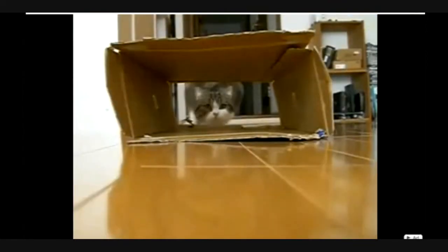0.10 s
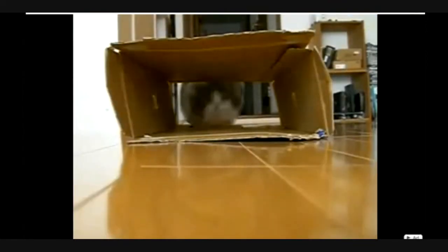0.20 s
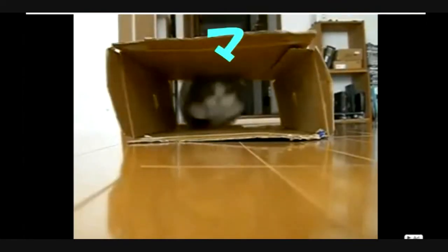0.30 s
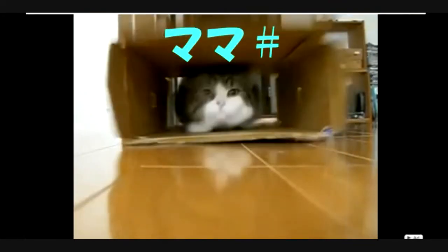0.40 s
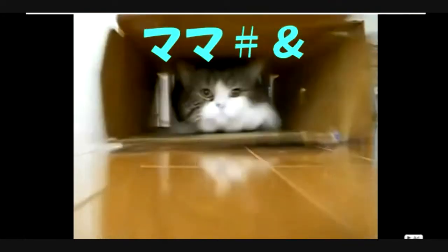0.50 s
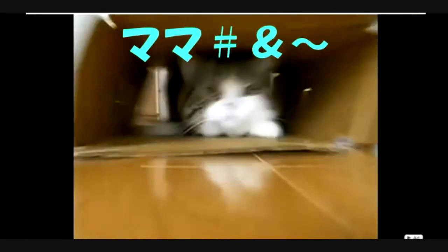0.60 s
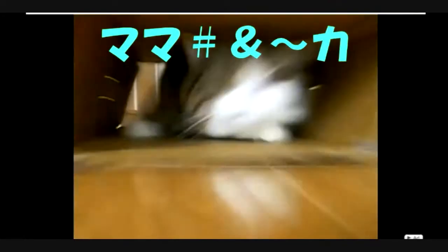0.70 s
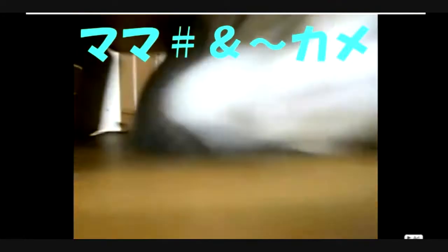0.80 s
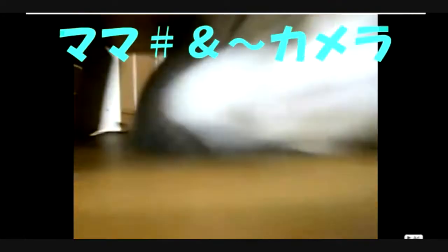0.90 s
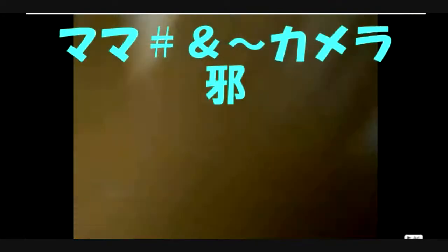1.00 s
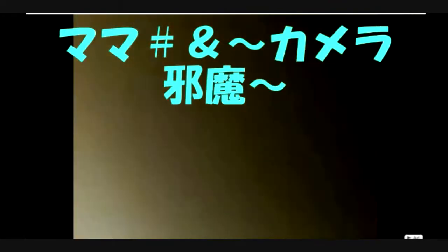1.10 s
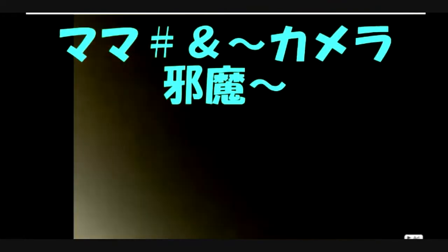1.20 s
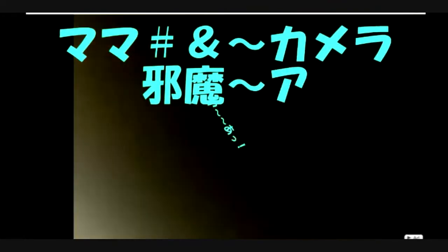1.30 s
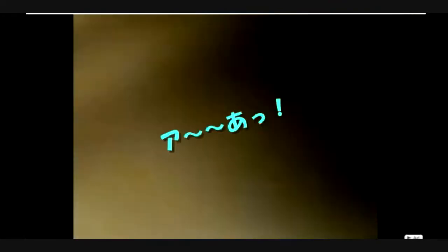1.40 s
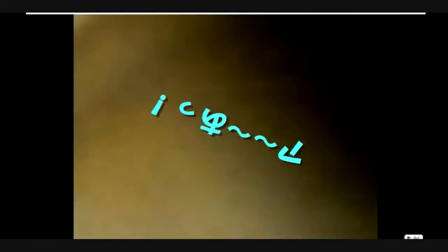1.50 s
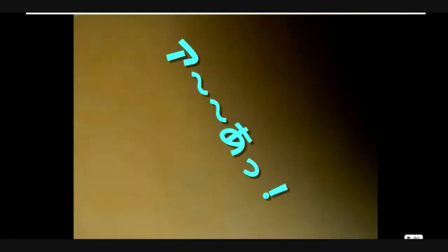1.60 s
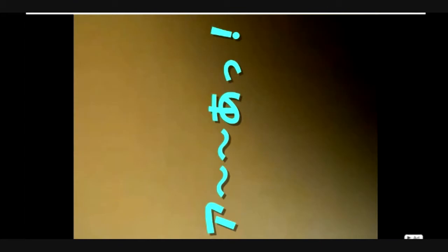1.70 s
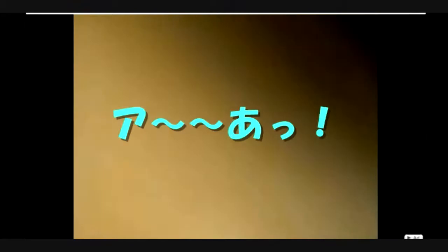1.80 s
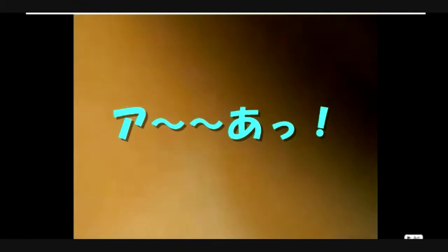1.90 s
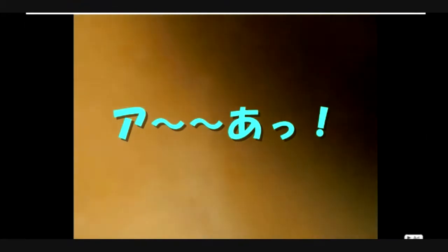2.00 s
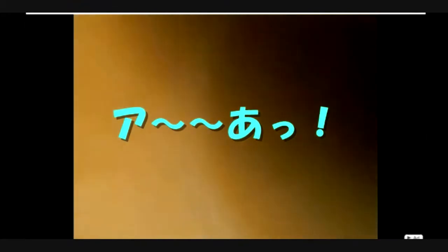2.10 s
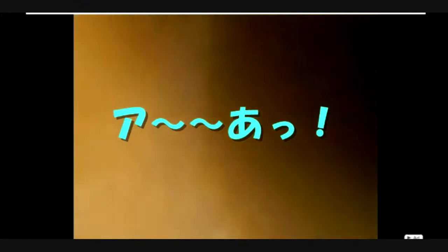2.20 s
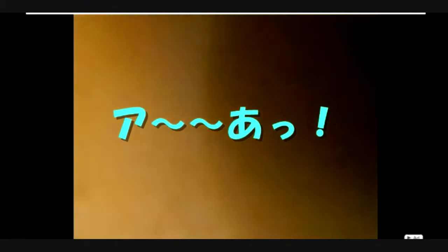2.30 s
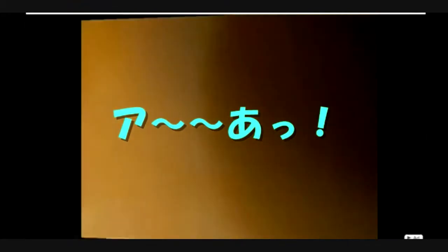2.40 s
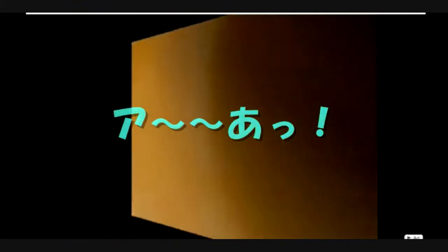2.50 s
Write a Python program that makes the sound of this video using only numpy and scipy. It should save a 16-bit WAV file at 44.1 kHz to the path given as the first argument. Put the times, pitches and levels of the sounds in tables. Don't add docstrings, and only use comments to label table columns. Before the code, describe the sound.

A cardboard box skids on a wooden floor, shoved by a cat. Near quiet at first, soft paw thuds from 0.1 s, stronger at 0.25 and 0.4. A bright rasp swells to 0.8 with heavy thumps, then eases into lighter scuffs and bumps. Hard knocks and cracks burst at 1.45-1.7; duller rumble and hollow taps follow from 2.0, fading by 2.6. Close, coarse, clipped camera sound indoors.

```python
import sys
import numpy as np
from scipy import signal
from scipy.io import wavfile
from scipy.ndimage import uniform_filter1d

SR = 44100
rng = np.random.default_rng(int(sys.argv[2]) if len(sys.argv) > 2 else 0)


def wrap_up_sound(samples):
    columns = np.atleast_2d(samples).T
    tamed = np.clip(columns, -1, 1)
    steps = np.round(tamed * 32767).astype(np.int16)
    wavfile.write(sys.argv[1], SR, steps)


def to_linear_factor(level_db):
    exponent = np.asarray(level_db, float) / 20
    return 10 ** exponent


N = 114660

# time in seconds, rumble level in dB.
BOX_WEIGHT = [(0, -58), (.08, -48), (.2, -33.5), (.3, -25.5), (.6, -25.5), (.64, -18), (.87, -20),
              (.91, -30.5), (1.05, -27.5), (1.22, -32), (1.35, -23), (1.47, -30.5), (1.58, -18.5),
              (1.8, -30.5), (2.1, -20.5), (2.25, -25), (2.5, -31), (2.6, -49)]
# time in seconds, rasp level in dB, brightness 0 to 1.
BOX_SLIDE = [(0, -70, 0.1), (0.129, -48, 0.4), (.23, -38.5, 1), (0.371, -30.5, 0.82), (0.578, -22, 0.89),
             (.63, -19.5, 1), (0.738, -20, 0.93), (.792, -15, 0.82), (.8, -30, 0.54), (.97, -30, 0.9),
             (1.13, -27.5, 0.69), (1.42, -28.5, 0.05), (1.48, -36, 0.8), (1.589, -27, 0.7),
             (1.749, -29.5, 0.17), (2.2, -26, 0.23), (2.371, -36.5, 0.05), (2.6, -49, 0.09)]
# start in seconds, length in seconds, gain change in
# dB.
CAMERA_HOPS = [(0.81, 0.027, -2), (0.898, 0.032, -5), (0.952, 0.043, -3.5), (1.466, 0.047, -5),
               (1.524, 0.014, -4), (1.546, 0.01, -5.5), (1.633, 0.017, -11), (1.681, 0.013, -8.5),
               (1.922, 0.013, -5.5), (1.964, .012, -3.5), (2.17, .022, -4.5), (2.257, 0.016, -5)]
# time in seconds, centre in Hz.
FLEX_PITCH = [
    (.3, 2330),
    (.45, 1950),
    (.55, 2010),
    (.63, 1540),
    (.76, 2460),
    (.9, 1650),
    (1.12, 2540),
    (1.3, 2710),
    (1.6, 1460),
]
# frequency in Hz, density in dB per Hz.
RUMBLE_SPECTRUM = [(12, -77), (20, -15.5), (136, 2), (227, -4), (520, -16.5), (689, -8.5), (1190, -36.5),
                   (1310, -21), (1800, -49), (2340, -47.5), (3960, -120)]
# frequency in Hz, density in dB per Hz.
RASP_SPECTRUM = [(290, -36), (500, -24), (539, -30), (587, -20), (1040, -7), (1300, -5.5), (1620, -4.5),
                 (3200, -4.5), (4800, -11), (6240, -31), (10600, -120)]
# frequency in Hz, density in dB per Hz.
SCUFF_SPECTRUM = [(240, -18), (400, -6), (588, -10), (1180, -13), (1500, -17), (2100, -24), (3130, -25),
                  (4800, -32), (6240, -62), (10600, -120)]
# frequency in Hz, width in Hz, lift in dB.
BOX_MODES = [(105, 18, -0.5), (140, 14.5, 5.5), (226, 39, 3.5), (369, 77, 1.5), (608, 23, 1.5),
             (1574, 196, 4), (2234, 30, 4.5), (2570, 68, 1.5)]
# start in seconds, peak in dB, boom pitch in Hz, slap re boom in dB.
THUD_EVENTS = [(.093, -21.5, 140, -13.5), (0.212, -16.5, 85, -5), (0.2255, -11.5, 94, -9),
               (0.247, -3, 124, -11.5), (.268, -11, 110, -19), (0.29, -12, 95, -9.5), (.384, -14, 97, -21),
               (0.393, -11.5, 97, -15), (.417, -5.5, 105, -7.5), (0.6505, -4, 124, -33),
               (0.698, -8.5, 109, -41), (0.725, -5.5, 124, -7), (0.748, -9, 97, -16), (0.786, -5, 116, -9),
               (.768, -23, 80.4, -12), (0.7942, -3, 105, -16), (0.813, -16, 128, -32),
               (0.824, -17, 151, -25), (0.863, -11, 192, -13), (0.932, -17, 190, -3),
               (0.9994, -13.5, 297, -7.5), (1.02, -14.5, 119, -5.5), (1.261, -20, 148, -4),
               (1.274, -17.5, 110, -3.5), (1.318, -20, 130, -12), (1.338, -17.5, 131, -10.5),
               (1.348, -12, 187, -7.5), (1.385, -16.5, 140, -11), (1.433, -11, 124, -9),
               (1.4557, -2, 136, -10), (1.5043, -9, 312, -8), (1.571, -15.5, 127, -5.5),
               (1.613, -2.5, 126, 0), (1.644, -1.5, 181, -12), (1.661, -8, 87.5, -21),
               (1.675, -19, 130, -16), (1.6896, -2, 140, -18), (1.727, -16, 281, 0.5),
               (1.975, -14, 201, -8.5), (1.994, -9.5, 208, -12.5), (2.03, -14, 174, -5),
               (2.065, -12.5, 208, -8), (2.097, -12, 222, -16), (2.106, -12, 200, -13),
               (2.137, -24, 190, -8), (2.156, -14.5, 235, 1), (2.163, -5, 224, -18), (2.207, -19, 195, -8),
               (2.241, -16, 228, -14), (2.3, -10, 190, -14)]
# frequency in Hz, density in dB per Hz.
SLAP_SPECTRUM = [(250, 14.5), (420, 8.5), (700, -27), (1100, -6.5), (2000, -8.5)]
# start in seconds, peak in dB, T60 in seconds.
CRACK_EVENTS = [(0.2135, -27, 0.16), (.387, -21, 0.021), (0.419, -20.5, 0.072), (.795, -14, 0.038),
                (0.8273, -11, 0.014), (0.937, -16.5, 0.024), (0.6053, -23, 0.019), (1.0018, -13.5, 0.027),
                (1.016, -22, 0.11), (1.429, -21.5, 0.1), (1.445, -18.5, 0.045), (1.453, -10, 0.027),
                (1.5023, -12.5, 0.026), (1.539, -17.5, 0.023), (1.559, -30, 0.065), (1.614, 0, 0.028),
                (1.642, -17.5, 0.077), (1.691, -10, 0.05), (1.6967, -5, 0.027), (1.727, -20.5, 0.042),
                (1.7618, -25, 0.043), (1.882, -24, 0.017), (1.916, -34, 0.014), (1.936, -21, 0.013),
                (1.979, -19, 0.018), (2.195, -20, 0.058), (2.27, -37, 0.025), (2.306, -15.5, 0.032)]
# frequency in Hz, density in dB per Hz.
CRACK_SPECTRUM = [(290, -36), (500, 4.5), (1230, -8), (1640, -4), (2240, -13.5), (2910, -12), (4700, -19),
                  (6110, -25), (10300, -120)]
# start in seconds, peak in dB, pitch in Hz,
# T60 in seconds.
PING_EVENTS = [(.387, -23, 1500, 0.055), (0.418, -20, 1543, 0.057), (.624, -13.5, 140, 0.28),
               (.675, -11, 129, .15), (.738, -10.5, 119, 0.18), (.794, -9, 257, .05),
               (0.8273, -21.5, 1625, .03), (.938, -19.5, 1560, 0.028), (1.431, -34, 1530, .05),
               (1.576, -29, 1710, 0.062), (1.6141, -9, 1626, 0.016), (1.6148, -11, 390, .07),
               (1.645, -13, 359, 0.1), (1.6915, -11.5, 393, 0.066), (1.696, -14, 1670, 0.035),
               (1.937, -28, 1665, 0.045), (1.98, -25, 1510, .05), (2.197, -22, 1454, 0.047),
               (2.272, -24, 1700, 0.046), (2.305, -30, 4440, 0.024), (2.329, -28, 1790, 0.041)]
# frequency in Hz, density in dB per Hz.
ROOM_TONE_SPECTRUM = [(15, -36), (25, -3), (145, 7), (275, -12), (350, -14.5), (2430, -35), (3610, -20),
                      (3850, -21.5), (4800, -20), (6240, -62), (10600, -120)]
# frequency in Hz, width in Hz, depth in dB.
BODY_NOTCHES = [(1179, 46, 14.5), (1930, 57, 6), (2343, 27, 10.5), (3590, 94, 8)]
# frequency in Hz, gain in dB.
PLAYBACK_RESPONSE = [(5000, 0.5), (6500, 1), (9500, -2), (11000, -13), (12000, -18.5), (13200, -63),
                     (15000, -97)]

TAP_RISE_S = 0.0015
FADE_FROM_S = 2.14


def drag():
    t = np.arange(N) / SR
    slide_s, rasp_db, brightness = np.transpose(BOX_SLIDE)
    share = np.clip(np.interp(t, slide_s, brightness), 0, 1)

    bumps = slips(per_s=900, spread_db=4.5) * to_linear_factor(-0.5 * wander(29))
    bumps = coloured(bumps, lambda hz: read(RUMBLE_SPECTRUM + [(4000, -54.5)], hz) + bells(BOX_MODES, hz))
    fast = grit(RASP_SPECTRUM)
    slow = grit(SCUFF_SPECTRUM)
    singing = resonate(fast, np.interp(t, *np.transpose(FLEX_PITCH)), width_hz=600)
    fast = evened(fast + to_linear_factor(-4) * evened(singing))
    sway_band = signal.butter(2, [20, 64], "band", fs=SR, output="sos")
    sway = evened(signal.sosfilt(sway_band, rng.standard_normal(N)))
    rasp = patchy(np.sqrt(share) * fast + np.sqrt(1 - share) * slow)

    deep = signal.sosfilt(signal.butter(1, 330, fs=SR, output="sos"), bumps)
    bumps = bumps + np.clip(0.74 * share, 0, 1) * (deep - bumps)
    weight = to_linear_factor(np.interp(t, *np.transpose(BOX_WEIGHT)))
    rumble = weight * (evened(bumps) + to_linear_factor(-2) * share * sway)
    return rumble + to_linear_factor(np.interp(t, slide_s, rasp_db)) * rasp


def grit(spectrum):
    x = slips(per_s=8000, spread_db=1.5) * to_linear_factor(1.9 * wander(71))
    return evened(coloured(x, lambda hz: read([(150, -38.0)] + spectrum, hz) + bells(BOX_MODES, hz)))


def slips(per_s, spread_db):
    chance = rng.random(N)
    size = rng.exponential(1, N)
    sign = rng.choice([-1., 1.], N)
    return sign * to_linear_factor(spread_db * np.minimum(size, 4)) * np.clip((per_s / SR - chance) * SR / 20, 0, 1)


def contact():
    t = np.arange(N) / SR
    off_db = sum(db * ((t > s) & (t < s + length_s)) for s, length_s, db in CAMERA_HOPS)
    return to_linear_factor(uniform_filter1d(off_db * 1., size=160))


def thuds():
    boom_cycles, rise_cycles, sag = 0.68, 0.26, 0.15
    push_s, slap_rise_s, slap_t60_s = 0.017, 0.0011, 0.044
    u = np.arange(SR // 8) / SR
    out, slap_level = np.zeros(N + SR), np.zeros(N + SR)
    push = u / push_s * np.exp(1 - u / push_s) * np.cos(u / push_s)
    for s, db, hz, slap_db in THUD_EVENTS:
        at = round(s * SR)
        turns = hz * u * (1 - sag * np.minimum(hz * u / 6, 1))
        boom = np.sin(2 * np.pi * turns) * (1 - np.exp(-turns / rise_cycles)) * np.exp(-turns / boom_cycles)
        push_db = -16.5 - 21.5 * np.log2(hz / 110)
        out[at:at + len(u)] += to_linear_factor(db) * (boom / abs(boom).max() + to_linear_factor(push_db) * push)
        slap = np.minimum(u / slap_rise_s, 1) * to_linear_factor(db + slap_db - 60 * u / slap_t60_s)
        slap_level[at:at + len(u)] += slap
    return out[:N] + ring(slap_level[:N], [(80, -43.5)] + SLAP_SPECTRUM + [(4000, -66)])


def cracks():
    u = np.arange(SR // 8) / SR
    level = np.zeros(N + SR)
    for s, db, t60_s in CRACK_EVENTS:
        burst = np.minimum(u / TAP_RISE_S, 1) * to_linear_factor(-2.5 + db - 60 * u / t60_s)
        level[round(s * SR):][:len(u)] += burst
    return ring(level[:N], [(200, -48.5)] + CRACK_SPECTRUM)


def pings():
    u = np.arange(SR // 8) / SR
    out = np.zeros(N + SR)
    for s, db, hz, t60_s in PING_EVENTS:
        envelope = np.minimum(u / TAP_RISE_S, 1) * to_linear_factor(db - 60 * u / t60_s)
        out[round(s * SR):][:len(u)] += envelope * np.sin(2 * np.pi * hz * u)
    return out[:N]


def room(x, t60_s=0.27):
    taps = np.zeros(SR // 3)
    at = np.arange(200, SR // 3 - 22, 22)
    taps[at + rng.integers(0, 22, len(at))] = rng.choice([-1., 1.], len(at))
    taps *= to_linear_factor(-60 * np.arange(len(taps)) / SR / t60_s)
    return signal.oaconvolve(x, taps / np.linalg.norm(taps))[:N]


def room_tone(level_db=-42, fade_db_per_s=-59):
    faded_s = np.maximum(np.arange(N) / SR - FADE_FROM_S, 0)
    return ring(to_linear_factor(level_db + fade_db_per_s * faded_s), ROOM_TONE_SPECTRUM)


def ring(level, spectrum):
    noise = rng.standard_normal(N)
    steady = coloured(noise, lambda hz: read(spectrum, hz))
    return coloured(level * noise, lambda hz: read(spectrum, hz)) / np.std(steady)


def resonate(x, hz, width_hz):
    turn = np.exp(2j * np.pi * np.cumsum(hz) / SR)
    r = np.exp(-np.pi * width_hz / SR)
    return 2 * (turn * signal.lfilter([1 - r], [1, -r], x / turn)).real


def patchy(x, spread_db=2):
    z = signal.stft(x, nperseg=256)[2]
    field = uniform_filter1d(rng.standard_normal(z.shape[::-1]), size=14, axis=0)
    field = uniform_filter1d(field, size=3, axis=1)
    return evened(signal.istft(z * to_linear_factor(spread_db * evened(field).T), nperseg=256)[1][:N])


def wander(rate_hz):
    band = signal.butter(1, [rate_hz / 8, rate_hz], "band", fs=SR, output="sos")
    return evened(signal.sosfiltfilt(band, rng.standard_normal(N)))


def coloured(x, db_of, size=8192):
    hz = abs(np.fft.fftfreq(size, 1 / SR))
    log_gain = np.log(to_linear_factor(np.maximum(db_of(hz), -100)))
    taps = np.fft.ifft(np.exp(np.conj(signal.hilbert(log_gain)))).real[:size // 2]
    return signal.oaconvolve(x, taps)[:len(x)]


def read(points, hz):
    f, value = np.transpose(points)
    return np.interp(np.log(hz + 1), np.log(f + 1), value)


def bells(table, hz):
    return sum(db / (1 + (2 * (hz - f) / width_hz) ** 2) for f, width_hz, db in table)


def evened(x):
    return x / np.sqrt(np.mean(x ** 2) + 1e-20)


def scene():
    blows = thuds() + cracks() + pings()
    rubbing = drag() * contact()
    return (rubbing + room_tone() + blows + to_linear_factor(-19) * room(blows))[None]


def roll_off(x):
    return signal.sosfilt(signal.butter(12, 16000, fs=SR, output="sos"), x)


def record(dry):
    duck_from_db, duck_share, duck_db_per_s = -13, 0.3, 200
    hold_samples, edge_hz, leak_db = 4, 4720, -24
    hiss_db, hiss_in_s = -72, 0.25
    glitch_s, glitch_db = 0.6606, -4.5
    x = coloured(dry[0], lambda hz: -bells(BODY_NOTCHES, hz))

    power_db = 10 * np.log10(abs(uniform_filter1d(x ** 2, size=300)) + 1e-12)
    fall_db = np.arange(N) * duck_db_per_s / SR
    held_db = np.maximum.accumulate(power_db + fall_db) - fall_db
    over_db = np.maximum(held_db - duck_from_db, 0)
    x = x / to_linear_factor(duck_share * uniform_filter1d(over_db, size=500, origin=249))
    x = x / (1 + abs(x / 0.88) ** 4) ** 0.25

    edge = signal.firwin(801, edge_hz, window=("kaiser", 9), fs=SR)
    low = signal.oaconvolve(x, edge, "same")
    x = low + to_linear_factor(leak_db) * np.minimum(over_db / 6, 1) * (x - low)
    held = np.repeat(x[::hold_samples], hold_samples)[:N]
    x = coloured(held, lambda hz: read(PLAYBACK_RESPONSE, hz))

    hiss_gain = np.clip((np.arange(N) / SR - FADE_FROM_S) / hiss_in_s, 0, 1)
    hiss = ring(1, [(3000, -6), (5500, 0), (9500, -4), (11500, -40)])
    x = x + to_linear_factor(hiss_db) * hiss_gain * hiss
    at = round(glitch_s * SR)
    x[at:at + 40] += to_linear_factor(glitch_db) * np.exp(-np.arange(40))
    return roll_off(x[None])


dry = scene()
out = record(dry)
wrap_up_sound(out)
```